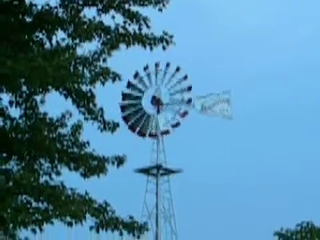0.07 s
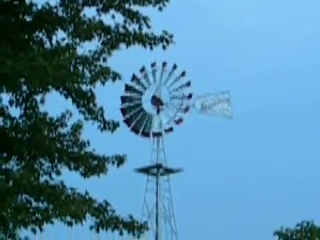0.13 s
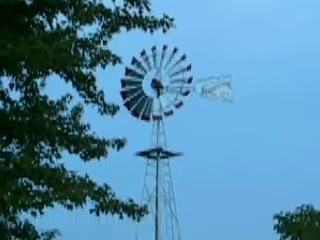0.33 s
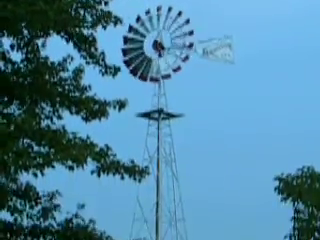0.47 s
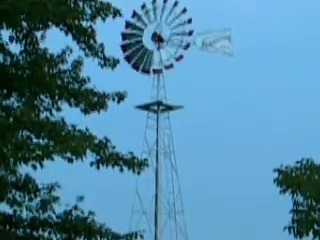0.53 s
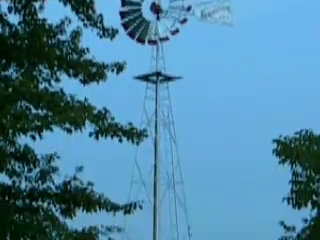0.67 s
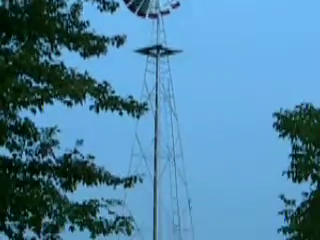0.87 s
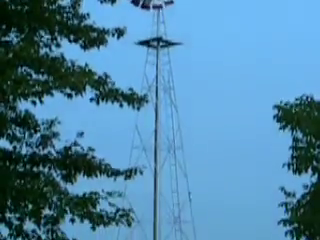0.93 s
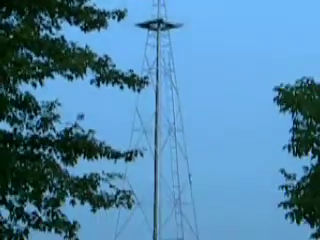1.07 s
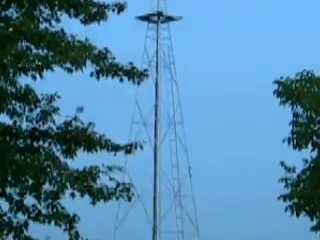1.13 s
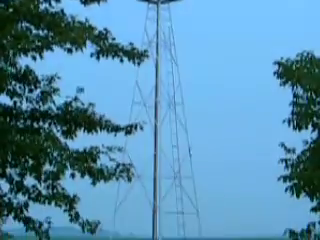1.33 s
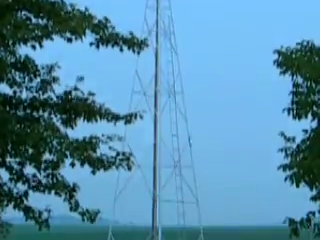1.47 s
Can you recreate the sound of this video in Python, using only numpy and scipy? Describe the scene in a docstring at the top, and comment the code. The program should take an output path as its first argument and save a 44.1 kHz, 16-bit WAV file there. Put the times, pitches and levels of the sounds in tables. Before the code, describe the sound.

Two sharp plastic knocks on a hand-held camera over steady dull wind in leafy trees

```python
"""A steady breeze in the trees by a farm windmill: shaped noise with drifting patches, plus one dying gust.
Under it: a low drone, a faint whine, rumble and hiss. Far birds whistle, as echoing frequency sweeps.
A hand-held camera body is knocked, then a part on it snaps: struck modes and gritty ticks, clipped on peaks.
After the snap the outdoor level drops and creeps back, while the hand bumps the case softly.
A dull, narrow-band microphone hears it all."""
import sys
import numpy as np
from scipy import signal
from scipy.fft import rfft, irfft
from scipy.io import wavfile
from scipy.ndimage import uniform_filter1d

SR = 44100
rng = np.random.default_rng(int(sys.argv[2]) if len(sys.argv) > 2 else 0)


def output_pcm(signal):
    """Save a mono or channel-first signal as 16-bit PCM at the path in sys.argv[1].

    Samples are clipped to [-1, 1] before scaling.
    """
    pcm = np.clip(np.atleast_2d(signal).T, -1, 1) * 32767
    wavfile.write(sys.argv[1], SR, np.round(pcm).astype(np.int16))


N = 66150
T = np.arange(N) / SR
MIC_LOW_HZ, MIC_EDGE_HZ, EDGE_HZ = 123, 4200, 16700
CLIP_LEVEL, OFFSET = 0.75, -0.012  # full scale = 1


def amp(db):
    """Decibels to gain."""
    return 10 ** (np.asarray(db) / 20)


def unit(x):
    """Scale to rms 1."""
    return x / np.sqrt(np.mean(x ** 2) + 1e-20)


def curve(points):
    """Gain over time, linear in dB between (t/s, level/dB) points."""
    return amp(np.interp(T, *np.transpose(points)))


def colour(points, hz):
    """Gain at hz, interpolated in dB over log frequency."""
    f, db = np.transpose(points)
    return amp(np.interp(np.log(hz + 1), np.log(f), db))


def since(s):
    """Seconds since s, zero before it."""
    return np.maximum(T - s, 0)


def lowpass(x, hz):
    """Steep linear-phase band limit."""
    taps = signal.firwin(301, hz, window=("kaiser", 9), fs=SR)
    return signal.oaconvolve(x, taps, "same")


def noise(points):
    """Steady noise of rms 1 with the given colour."""
    spectrum = rfft(rng.standard_normal(N))
    gain = colour(points, np.fft.rfftfreq(N, 1 / SR))
    return unit(irfft(spectrum * gain, N))


def waver(width_hz):
    """Slow complex Gaussian noise of rms 1; width_hz is the 1/e half-width of its filter."""
    f = np.fft.fftfreq(N, 1 / SR)
    white = rng.standard_normal(N) + 1j * rng.standard_normal(N)
    z = np.fft.ifft(np.fft.fft(white) * np.exp(-(f / width_hz) ** 2))
    return z / np.sqrt(np.mean(abs(z) ** 2))


def tone(hz, width_hz, rough):
    """Tone of rms 1, wavering in level and phase."""
    carrier = np.exp(2j * np.pi * hz * T)
    return unit(((1 + rough * waver(width_hz)) * carrier).real)


def ring(modes, s, corner_hz, push_s, order=1):
    """Decaying modes struck at s; slow push softens onset, corner cuts treble, order -1 alternates signs."""
    t = since(s)
    total = np.zeros(N)
    for k, (hz, db, t60_s) in enumerate(modes):
        decay = amp(db - 60 * t / t60_s)
        treble_cut = np.hypot(1, (hz / corner_hz) ** 2)
        total += order ** k * decay * np.sin(2 * np.pi * hz * t) / treble_cut
    return (1 - np.exp(-t / push_s)) * total


# leaf noise colour: f/Hz, relative level/dB per Hz
BREEZE_COLOUR = [(40, -23.5), (70, 1), (100, -9), (150, -13.5), (300, -2.5), (400, -8.5), (500, 1),
                 (640, -10), (740, -5), (820, 2), (890, -2.5), (1000, 1.5), (1220, -4), (1470, -2),
                 (1750, -7), (2100, -6), (2320, -10.5), (2520, -7), (3050, -13.5), (3600, -21),
                 (4000, -30.5), (4400, -38.5)]
BREEZE_DB, PATCH_RMS_DB, SWELL_RMS_DB = -32.5, 1.4, 0.18  # BREEZE_DB: rms before the dip


def breeze():
    """Leaf noise: random spectra with drifting time-frequency patches and a slight swell."""
    window, hop = 2048, 512
    frames, hz = N // hop + 6, np.fft.rfftfreq(window, 1 / SR)
    real, imag, patches = rng.standard_normal((3, frames, len(hz)))
    patches = uniform_filter1d(patches, size=6, axis=0)
    patches = unit(uniform_filter1d(patches, size=12, axis=1))
    swell = unit(uniform_filter1d(rng.standard_normal(frames), size=14))[:, None]
    drift = amp(PATCH_RMS_DB * patches + SWELL_RMS_DB * swell)
    spectra = (real + 1j * imag) * colour(BREEZE_COLOUR, hz) * drift
    leaves = signal.istft(spectra.T, nperseg=window, noverlap=window - hop)[1][:N]
    return amp(BREEZE_DB) * unit(leaves)


# duller gust colour: f/Hz, relative level/dB per Hz
GUST_COLOUR = [(100, -28.5), (220, -18), (300, -6.5), (390, -8.5), (470, 3.5), (560, -9.5), (720, -2),
               (830, -3), (1100, -22.5), (2000, -41.5)]
# gust rms before the dip: t/s, level/dB
GUST_LEVEL = [(0, -39.5), (.12, -35.5), (.22, -39), (.32, -41), (.6, -65)]


def gust():
    """Duller wind noise that dies away."""
    return curve(GUST_LEVEL) * noise(GUST_COLOUR)


# drone gain before the dip: t/s, level/dB
DRONE_LEVEL = [(0, -63), (.26, -56), (.31, -31), (.39, -37), (.42, -50), (.85, -40.5), (1.02, -45),
               (1.11, -42.5), (1.18, -33.5), (1.28, -46.5), (1.5, -38)]


def drone():
    """Low wavering tone that comes and goes."""
    return curve(DRONE_LEVEL) * tone(hz=103.5, width_hz=14, rough=0.35)


def whine():
    """Faint far tone: constant mean level, slight waver."""
    return amp(-44) * tone(hz=807, width_hz=9, rough=0.54)


# wind and handling rumble colour: f/Hz, relative level/dB per Hz
RUMBLE_COLOUR = [(25, -2), (70, 5), (110, 0.5), (160, 0), (205, 2), (270, -20.5), (360, -8), (600, -27.5),
                 (1500, -54)]
RUMBLE_DB = -45


def rumble():
    """Steady low noise of wind and handling at the microphone."""
    return amp(RUMBLE_DB) * noise(RUMBLE_COLOUR)


# microphone hiss colour: f/Hz, relative level/dB per Hz
HISS_COLOUR = [(200, -0.5), (2500, -4), (3500, 2.5), (4000, -6), (4400, -10.5)]
HISS_DB = -55.5


def hiss():
    """Steady microphone noise."""
    return amp(HISS_DB) * noise(HISS_COLOUR)


# far bird notes: t/s, length/s, start f/Hz, end f/Hz, level/dB
BIRD_NOTES = [(.18, .055, 2850, 2580, -35.5), (.285, .06, 2783, 2340, -41.5),
              (0.351, 0.0433, 2850, 2558, -35), (0.375, 0.14, 2640, 2622, -38),
              (.75, 0.065, 2633, 2377, -38), (0.841, .08, 2730, 2715, -40.5), (1.10, .05, 2613, 2657, -47),
              (1.208, 0.079, 2660, 2430, -50), (1.316, 0.031, 2630, 2750, -41.5),
              (1.352, 0.08, 2580, 2366, -38), (1.371, 0.1, 3063, 3190, -47.5)]
BIRD_WIDTH_HZ, BIRD_BLUR, BIRD_ECHO_DB, BIRD_T60_S = 70, 0.8, -4.5, 0.35


def birds():
    """Linear frequency sweeps, blurred by distance, echoing among the trees as decaying noise."""
    direct = np.zeros(N)
    for s, length_s, start_hz, end_hz, db in BIRD_NOTES:
        u = np.clip((T - s) / length_s, 0, 1)
        turns = np.cumsum(start_hz + (end_hz - start_hz) * u) / SR
        envelope = np.sqrt(abs(np.sin(np.pi * u)))
        blur = 1 + BIRD_BLUR * waver(BIRD_WIDTH_HZ)
        direct += amp(db) * envelope * (blur * np.exp(2j * np.pi * turns)).real
    tail = rng.standard_normal(N) * amp(-60 * T / BIRD_T60_S)
    echo = signal.fftconvolve(direct, tail / np.linalg.norm(tail))[:N]
    return direct + amp(BIRD_ECHO_DB) * echo


# camera body modes: f/Hz, relative level/dB, t60/s
BODY_MODES = [(213, -4.5, 0.058), (330, -5, 0.047), (360.5, -18, 0.19), (408, -3.5, 0.073),
              (493, -14.5, 0.06), (618, -3.5, 0.059), (684, -8.5, 0.048), (840, -19, 0.043),
              (952, -17, 0.11), (1051, -9.5, 0.062), (1238, -5.5, 0.032), (1470, -7.5, 0.027)]
# knocks and soft hand bumps: t/s, level/dB, treble corner f/Hz, push time/s
BLOWS = [(.193, -24, 800, 0.0024), (.2514, 1, 3000, 0.00087), (0.5389, -25.5, 700, 0.0011),
         (0.5447, -18, 680, .001), (1.044, -22, 200, .002), (1.087, -13.5, 260, .002),
         (1.165, -13.5, 245, .002), (1.21, -21.5, 220, .002), (1.447, -13, 201, 0.003)]


def knocks():
    """Blows ring the body modes; longer pushes and lower corners make softer bumps."""
    out = np.zeros(N)
    for s, db, corner_hz, push_s in BLOWS:
        out += amp(db) * ring(BODY_MODES, s, corner_hz, push_s)
    return out


# hard plastic shell modes: f/Hz, relative level/dB, t60/s
SHELL_MODES = [(2200, -4.5, 0.016), (2494, -7, 0.012), (2680, -1.5, 0.012), (2974, -2, 0.01),
               (3430, -4.5, .011), (3654, -7, 0.018), (3960, -20.5, 0.036)]
# hard contacts: t/s, level/dB
CONTACTS = [(.2490, 0), (0.2595, -20), (0.4962, -15.5)]
# contact grit colour: f/Hz, relative level/dB per Hz
GRIT_COLOUR = [(100, -29), (1200, 1), (1800, -11), (2250, -4), (2750, 3), (3700, 11.5), (4200, 9.5)]
TICK_RISE_S, GRIT_DB, GRIT_T60_S = 0.00099, -10.5, 0.022


def ticks():
    """Hard contacts ring the bright shell modes, each with a burst of decaying grit."""
    grit, out = noise(GRIT_COLOUR), np.zeros(N)
    for s, db in CONTACTS:
        t = since(s)
        rise = np.minimum(t / TICK_RISE_S, 1)
        rattle = grit * rise * amp(GRIT_DB - 60 * t / GRIT_T60_S)
        shell = ring(SHELL_MODES, s, MIC_EDGE_HZ, TICK_RISE_S, order=-1)
        out += amp(db) * (shell + rattle)
    return out


# snapping plastic part modes: f/Hz, relative level/dB, t60/s
CATCH_MODES = [(214, -13, 0.028), (373, -25.5, 0.14), (495, -1, 0.019), (689, 1.5, 0.019), (830, 0, 0.014),
               (968, -8.5, .028), (1356, -16, 0.02), (2210, -10.5, 0.0093), (2576, -15, 0.0087)]
SNAP_S, SNAP_DB, SNAP_PUSH_S = 0.4966, 1, 0.0005


def snap():
    """Sharp release rings a small, well damped part, neighbouring modes in opposite sign."""
    return amp(SNAP_DB) * ring(CATCH_MODES, SNAP_S, MIC_EDGE_HZ, SNAP_PUSH_S, order=-1)


# outdoor gain around the snap: t/s, level/dB
DIP_LEVEL = [(.499, -2), (.52, -14), (.62, -16.5), (.74, -11), (.86, -7), (.96, -3), (1.08, -2.5)]


def dip(outdoors):
    """Outdoor level drops after the snap and creeps back."""
    return outdoors * curve(DIP_LEVEL)


def scene():
    """Sum at one microphone; the dip acts on outdoor sound only."""
    outdoors = breeze() + gust() + drone() + whine() + birds()
    floor = rumble() + hiss()
    handling = knocks() + ticks() + snap()
    return (dip(outdoors) + floor + handling)[None]


def record(dry):
    """Narrow-band microphone, hard clipping on peaks, band limit, small steady offset."""
    b, a = signal.butter(2, MIC_LOW_HZ, "high", fs=SR)
    heard = signal.lfilter(b, a, lowpass(dry[0], MIC_EDGE_HZ))
    clipped = np.clip(heard, -CLIP_LEVEL, CLIP_LEVEL)
    return lowpass(clipped, EDGE_HZ)[None] + OFFSET


dry = scene()
out = record(dry)
output_pcm(out)
```